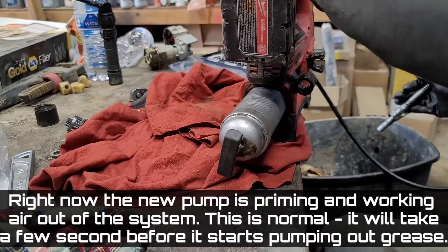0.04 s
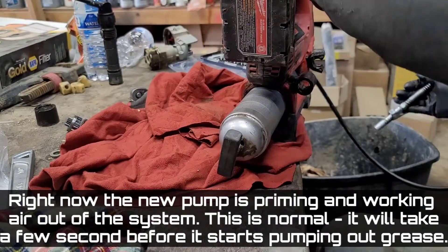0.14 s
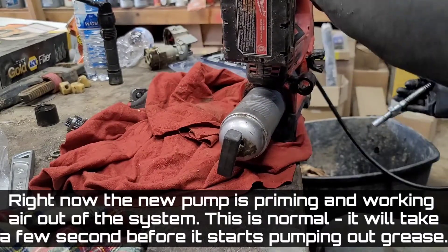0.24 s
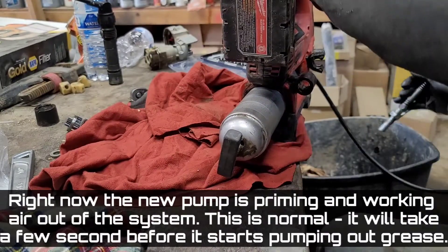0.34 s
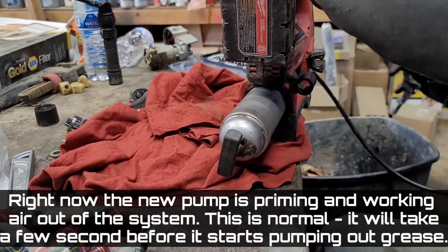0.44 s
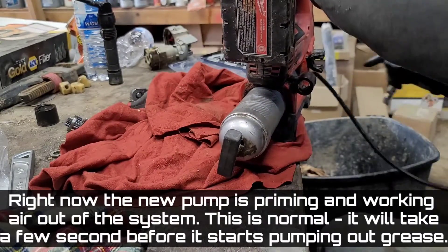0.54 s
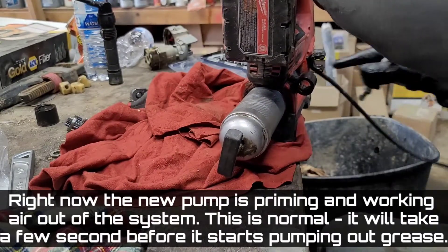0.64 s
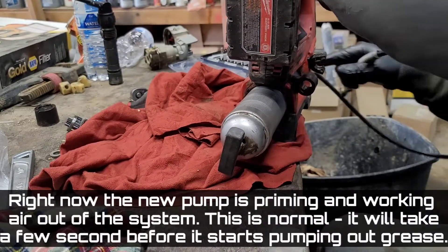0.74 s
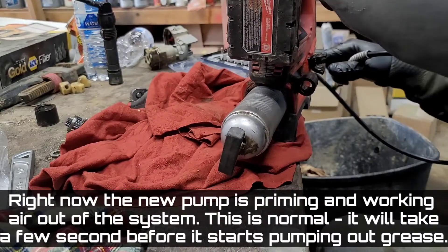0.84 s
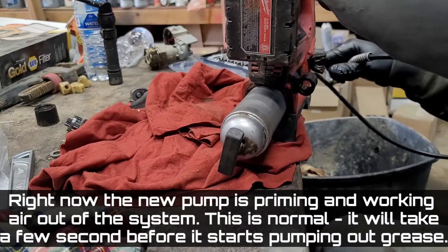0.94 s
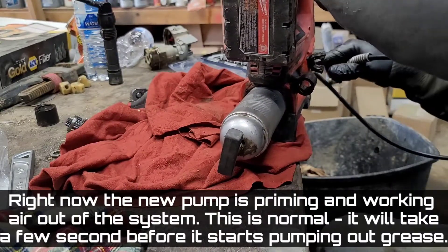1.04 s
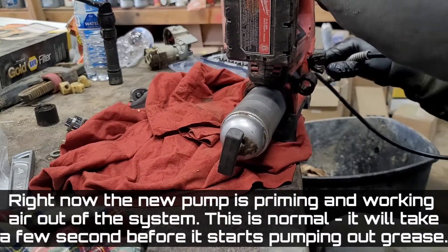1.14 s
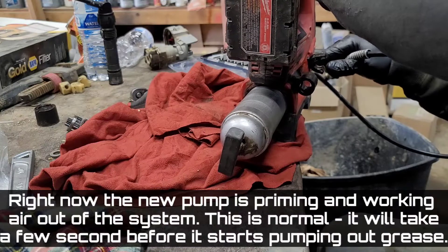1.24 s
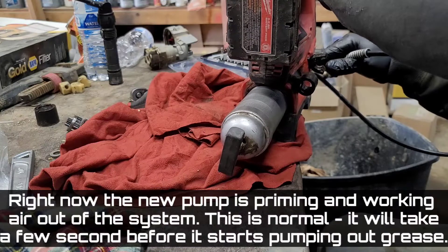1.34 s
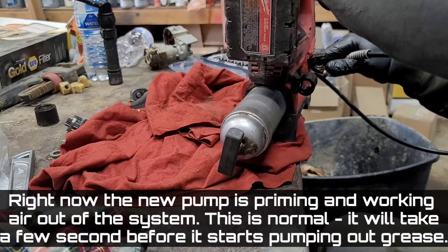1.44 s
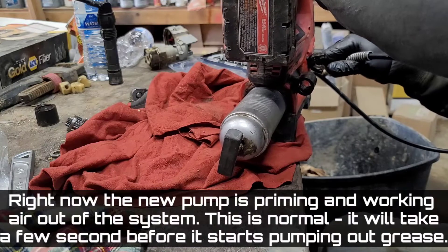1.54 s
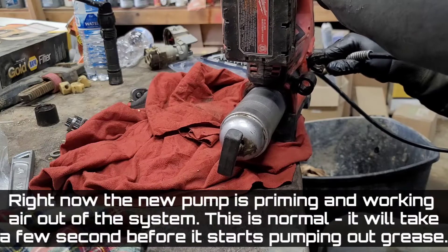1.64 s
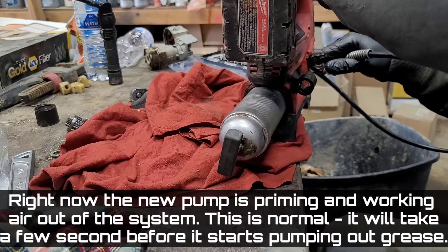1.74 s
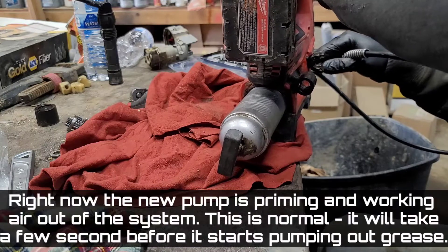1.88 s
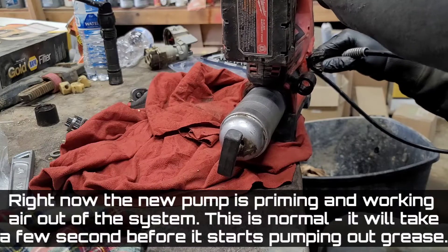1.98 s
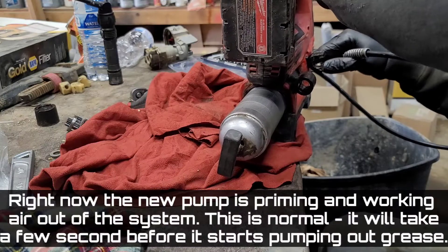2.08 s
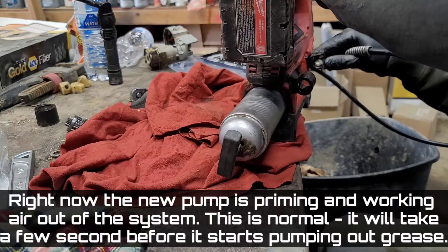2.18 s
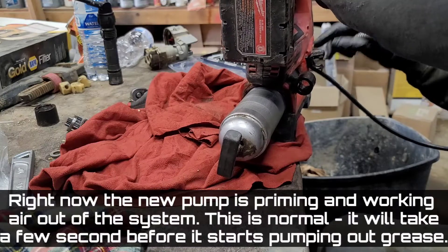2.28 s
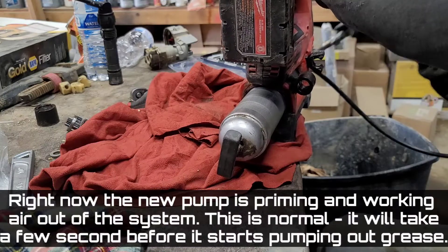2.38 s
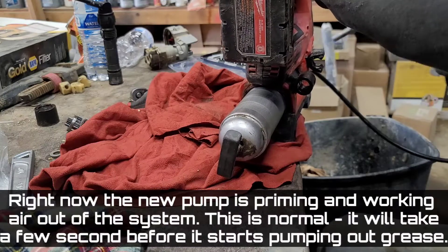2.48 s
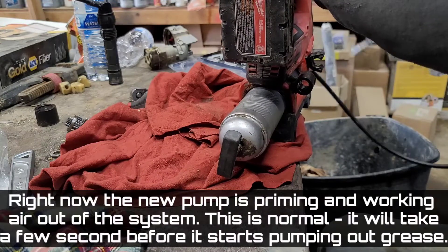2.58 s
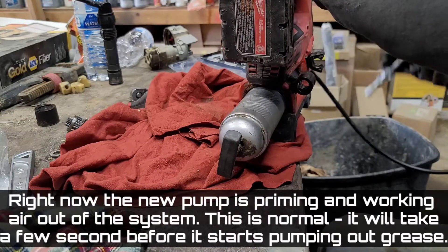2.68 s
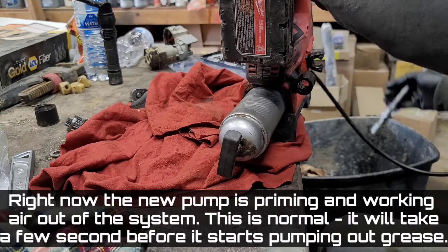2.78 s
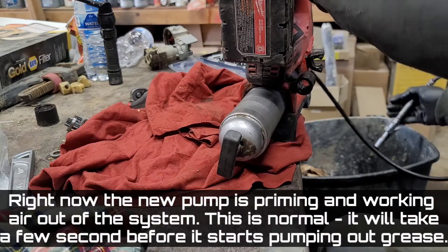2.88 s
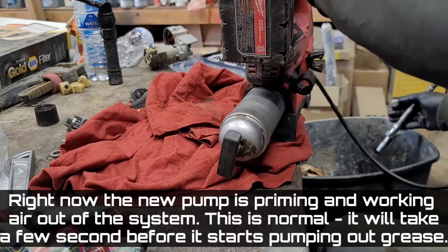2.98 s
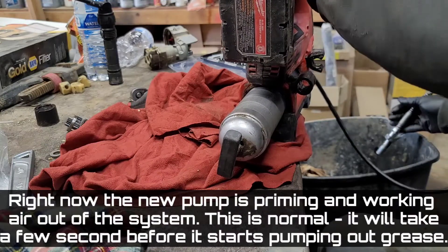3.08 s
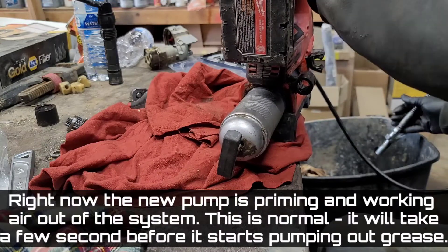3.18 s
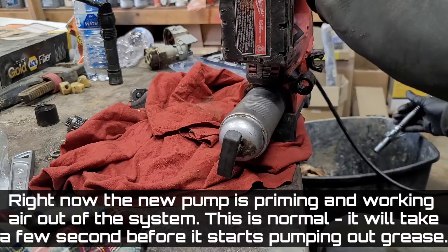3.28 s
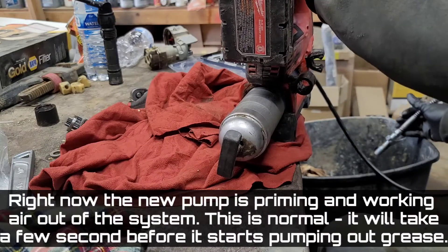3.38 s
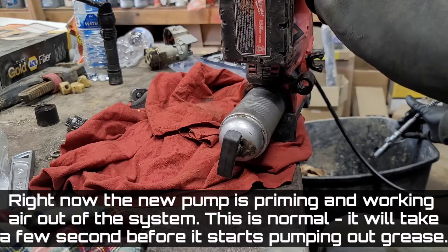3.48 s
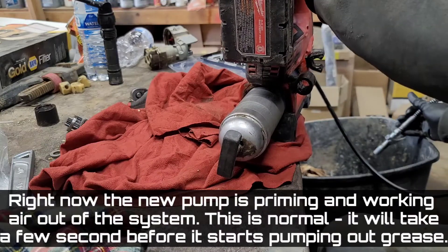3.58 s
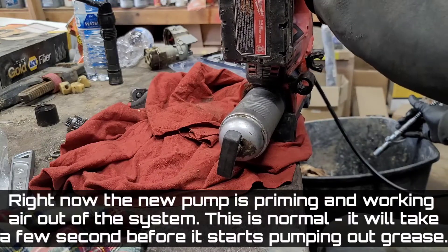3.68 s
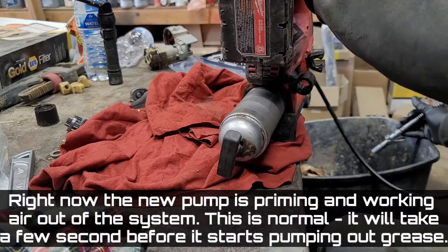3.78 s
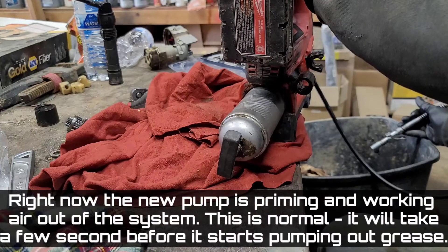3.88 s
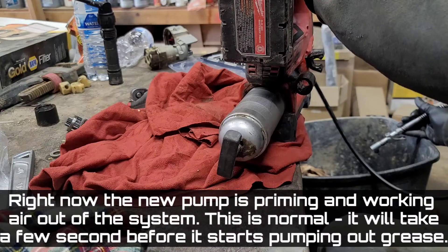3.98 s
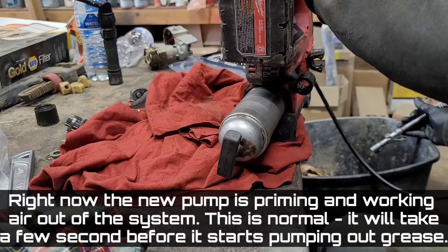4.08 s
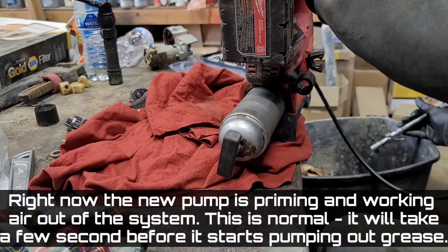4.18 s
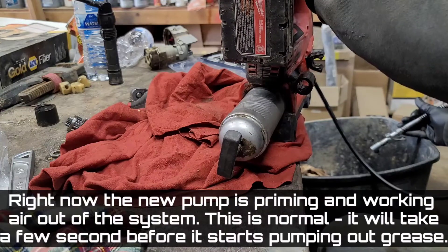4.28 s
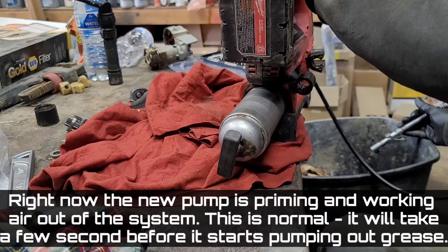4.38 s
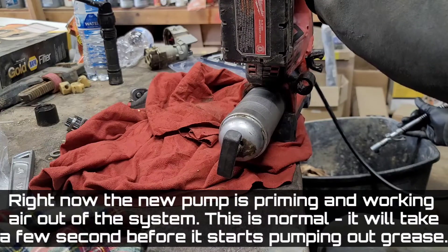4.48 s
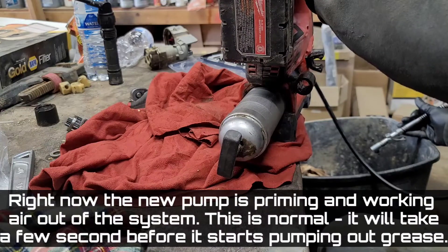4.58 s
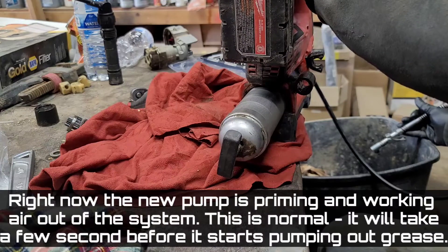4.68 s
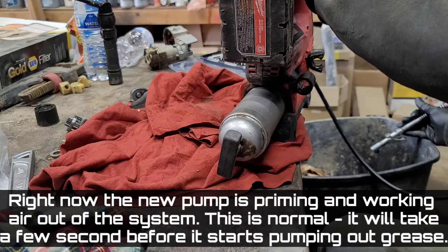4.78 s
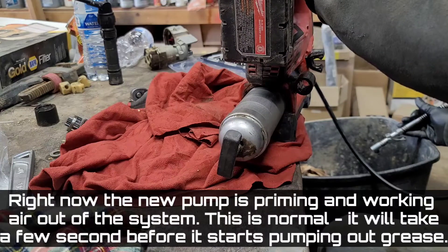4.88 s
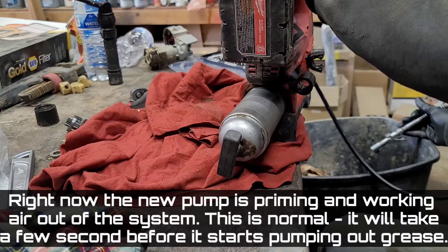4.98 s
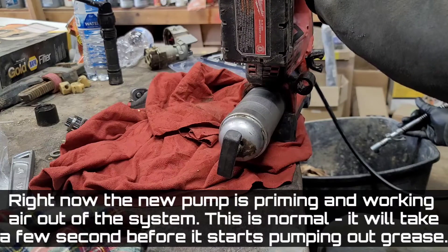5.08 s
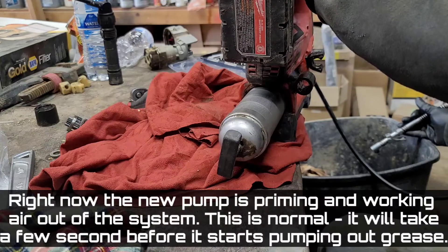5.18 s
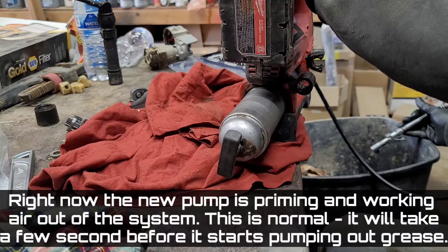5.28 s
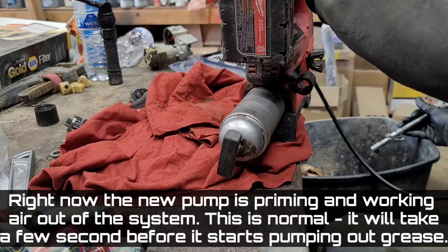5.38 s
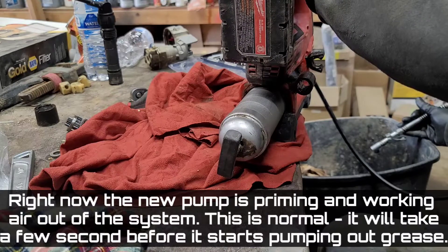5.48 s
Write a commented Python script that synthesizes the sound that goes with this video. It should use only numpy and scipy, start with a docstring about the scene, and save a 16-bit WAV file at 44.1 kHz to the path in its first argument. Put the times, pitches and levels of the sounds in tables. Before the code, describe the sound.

A battery grease gun whines at full speed, cuts out abruptly, leaves quiet workshop hum, then clicks and whirs back up to run on.

```python
"""Close on a workbench, a battery grease gun runs at full speed: shaft tones over gear and air noise.
At 0.63 s the trigger is let go; the motor slows, the gears jolt to a halt and small metal ticks follow.
Near 1.9 s a faint peep sounds far off; then switch clicks, and at 2.73 s the motor spins up again under a
fixed chopping tone, with one more jolt as the gears take up the load, and runs on to the end.
Throughout, a workshop hums, hisses and echoes around a stereo camera microphone."""
import sys
import numpy as np
from scipy import signal
from scipy.fft import rfft, irfft, next_fast_len
from scipy.io import wavfile
from scipy.ndimage import uniform_filter1d, map_coordinates

SR = 44100
rng = np.random.default_rng(int(sys.argv[2]) if len(sys.argv) > 2 else 0)


def digitize_waveform(pressure):
    """Quantize a signal to 16-bit integers and store it at the path in sys.argv[1].

    Rows of a 2-D input are taken as channels; values are limited to [-1, 1].
    """
    field = np.atleast_2d(pressure).T
    bounded = np.clip(field, -1, 1)
    quanta = np.round(bounded * 32767).astype(np.int16)
    wavfile.write(sys.argv[1], SR, quanta)


N = 243828
TIME = np.arange(N) / SR  # s

# All levels are relative settings, before the trims in the functions.
# Shaft speed at full power, as the load of the pump lets it run: [t/s, f/Hz]
FULL_SPEED = [(0, 309), (.1, 309.6), (.4, 306.9), (.52, 309.2), (2.92, 306), (3.1, 309), (3.28, 307.4),
              (3.4, 309.3), (3.47, 307.8), (3.62, 310.9), (3.95, 310.1), (4.06, 312.3), (4.38, 309.9),
              (4.55, 311.7), (4.9, 311), (5.02, 312.8), (5.2, 310.7), (5.53, 312)]
# The main whine: [shaft order, left over right/dB, right lead/rad]
MAIN_WHINE = (12, 2, .4)
# Other tones tied to the shaft: [shaft order, left level/dB, right level/dB, right lead/rad, blur/Hz,
# steady share of power 0-1]
SHAFT_TONES = [(1, -43.5, -52.5, 2.2, 7, .93), (2, -58, -54, -2.2, 8, .6), (3, -59, -52, 2.4, 8, .6),
               (4, -60, -55, 2.0, 10, .5), (5, -41, -42, -2.2, 9, .7), (6, -48, -53, .2, 14, .5),
               (10.22, -47, -41, -.4, 12, .65), (11, -51, -49, 0, 18, .4), (13, -55, -55, 0, 25, .4),
               (20, -45, -54, 1.0, 20, .75), (25, -57, -64, .9, 30, .4), (30, -50, -41.5, 2.4, 20, .7),
               (35, -51, -43.5, -1.6, 20, .75)]
# Resonances that the whine crosses as the speed changes: [f/Hz, width/Hz, gain/dB]
WHINE_RESONANCES = [(2330, 220, 6), (3470, 260, 6.5)]
# Spectrum of the gear whirr at the left port: [f/Hz, level/dB per Hz]
GEAR_SPECTRUM = [(88, -55), (150, -27.5), (254, -25), (305, -9.5), (403, -18), (621, -6), (986, -13),
                 (1520, -4.5), (2070, -9.5), (2730, -6), (3610, -2), (4340, -10.5), (6000, -14),
                 (7800, -24.5), (13200, -120)]
# Spectrum of cooling air and brushes at the left port: [f/Hz, level/dB per Hz]
AIR_SPECTRUM = [(3000, -33.5), (4500, -6.5), (5500, -11), (6800, 4), (7600, -3.5), (8600, -2), (9600, -3),
                (10500, 2.5), (11200, -3), (11900, -6), (13000, -4.5), (13800, 0), (14400, -6.5),
                (15200, 3)]
# Peaks and dips of the housing: [f/Hz, width/Hz, gain/dB]
HOUSING_RESONANCES = [(776, 36, 1), (1843, 64, 4), (2300, 132.2, 7), (3450, 158.6, 0), (4580, 110, 2.5),
                      (6825, 120, -2.5), (8400, 120, 3), (8760, 100, 2.5), (10510, 460, -11.5),
                      (14200, 390, -6.5), (15360, 300, 4.5)]
# How the two microphone ports hear the gun, the right one shadowed in two bands: [f/Hz, left over right/dB]
PORT_BALANCE = [(200, -1), (330, 6), (600, 4), (900, -1), (2000, .5), (5800, 0), (6900, 5), (7600, 13),
                (8300, 11), (9000, 0), (10600, -7), (11600, 2), (12900, 10), (14000, 4)]
# How alike the gun's noise is at the two ports: [f/Hz, likeness -1 to 1]
GUN_LIKENESS = [(150, 0.75), (330, 0.79), (700, 0.29), (1300, 0.28), (2000, 0.8), (2700, .1), (3700, 0.64),
                (4300, 0.24), (6500, 0.077), (8500, 0.025), (9300, -0.13), (10800, -0.69), (14000, 0.42),
                (15300, -0.2)]
# The chopping tone and its two overtones: [level/dB] each
CHOP_LEVELS = [-38, -33, -55]
# Jolts of the gear train, at the halt and on taking up the load: [t/s, level/dB, left over right/dB,
# dullness, brighter below 0]
GEAR_JOLTS = [(.672, -37.5, -5, 0), (.684, -30, 4, -0.034), (2.873, -29, 0, -0.48)]
# Ringing of the gun's case: [f/Hz, level/dB, t60/s]
CASE_MODES = [(797, 0, .08), (700, -4, .05), (1150, -6, .03), (1507, -5, .03), (1803, -6, .03),
              (300, -13, .22)]
# Clicks of trigger and switch: [t/s, level/dB, left over right/dB, dullness]
SWITCH_CLICKS = [(2.5, -61, 0, .3), (2.6615, -42, 2.5, .5), (2.7093, -24, 2.5, .2)]
# Ringing of the switch: [f/Hz, level/dB, t60/s]
SWITCH_MODES = [(900, -15, .015), (1480, -7, .035), (1900, -6, .014), (2358, 0, .012), (2972, -5, .014),
                (3510, -6, .015), (4900, -9, .01), (6400, -8, .012)]
# Small metal ticks after the stop, each with a bounce: [t/s, level/dB, left over right/dB]
METAL_TICKS = [(.9845, -62, -.5), (.999, -66, -.5), (1.0975, -64, 1), (1.113, -71, 1)]
# Ringing of the ticks: [f/Hz, level/dB, t60/s]
TICK_MODES = [(3400, -3, .05), (3520, 0, .04), (3650, -3, .02), (2650, -8, .02), (4700, -10, .02),
              (6800, -9, .015)]
# A faint far peep: [from t/s, to t/s, f/Hz, level/dB]
FAR_PEEP = (1.91, 2.03, 4470, -87)
# The workshop's answer: [f/Hz, t60/s, echo level/dB]
WALL_ECHO = [(300, 0.25, 1), (1480, 0.35, 5.5), (3507, 0.34, -2.5), (7250, 0.282, -7), (12890, 0.2, -6)]
# Workshop hum and hiss: [f/Hz, level/dB per Hz]
SHOP_SPECTRUM = [(12, -45.5), (20, -14), (74, -1), (108, -8), (180, -12.5), (217, -16), (300, -15),
                 (430, -17.5), (790, -22), (860, -27), (2160, -37), (4460, -46.5), (7000, -46),
                 (7600, -54.5), (15500, -67.5)]
# How alike the workshop is at the two ports: [f/Hz, likeness -1 to 1]
SHOP_LIKENESS = [(40, .92), (90, .9), (150, .8), (380, -.18), (950, -.5), (2380, -.2), (6000, 0)]

FULL_HZ = 311  # reference speed of the shaft in full run
# trigger let go (s), slowing under the brake (Hz per s), gears halt (s)
RELEASE_S, BRAKE_HZ_PER_S, HALT_S = .63, 700, .684
START_S, RAMP_S = 2.73, .083  # soft start: the drive's duty climbs to full
KICK_HZ, RAMP_HZ, CATCH_UP_S = 80, 197, .023  # speed as the ramp begins and ends, time constant of the rest
# gear whirr: level, growth with speed on the restart, rise time, decay after the halt
WHIRR_DB, WHIRR_DB_PER_DECADE, WHIRR_ATTACK_S, WHIRR_DIES_DB_PER_S = -31, 24, 0.011, 600.5
# main whine: unloaded, growth with speed, dB per Hz of lost speed
WHINE_DB, WHINE_DB_PER_DECADE, WHINE_LOAD_DB = -32.8, 40, -.6
THIN_DB, THIN_LOAD_DB = 1.5, 0.65  # thin tones: gain unloaded, dB per Hz of lost speed
CHOP_HZ = 1988
CHOP_DULLS_DB, DUTY_FROM = -5, .06  # overtone change per unit of duty; duty at which the ramp begins
SHOP_DB = -56
TOP_HZ = 15510  # middle of the microphone's upper cut-off


def motor():
    """Shaft tones, gear whirr and air all follow the shaft speed: toward the ports, and toward the walls."""
    speed, load = shaft()
    turns = np.cumsum(speed + .55 * wobble(14)) / SR
    pace = speed / FULL_HZ
    running = gate(0, HALT_S - .012, fade=.012) + gate(START_S, N / SR, fade=.012)
    tones = main_whine(speed, load, turns, running) + shaft_tones(pace, load, turns, running)
    noise, noise_away = whirr_and_air(pace, turns)
    return noise + tones, noise_away + amp(-6) * tones


def shaft():
    """Shaft speed, and speed lost to the load: braked on release; ramped, then catching up, at the start."""
    full = np.interp(TIME, *np.transpose(FULL_SPEED))
    braked = full - BRAKE_HZ_PER_S * np.clip(TIME - RELEASE_S, 0, .3)
    ramp = np.interp(TIME, [START_S, START_S + RAMP_S], [KICK_HZ, RAMP_HZ])
    behind = np.exp(-np.maximum(TIME - START_S - RAMP_S, 0) / CATCH_UP_S)
    starting = full - (full - ramp) * behind
    speed = np.where(TIME < (HALT_S + START_S) / 2, braked, starting)
    return speed, FULL_HZ - full


def main_whine(speed, load, turns, running):
    """The strongest shaft tone, swelling with speed and as its pitch crosses resonances."""
    order, pan_db, lead = MAIN_WHINE
    hz = order * speed
    level_db = WHINE_DB + WHINE_LOAD_DB * load + WHINE_DB_PER_DECADE * np.log10(speed / FULL_HZ)
    level_db = level_db + peaks(HOUSING_RESONANCES, hz) + peaks(WHINE_RESONANCES, hz)
    tone = running * amp(level_db) * blurred(turns, order, blur_hz=20, steady=.84)
    return at_ports(tone, pan_db / 2, -pan_db / 2, lead)


def shaft_tones(pace, load, turns, running):
    """Tones at multiples of the shaft speed; the higher the order, the faster it grows with speed."""
    # with the load, the thin tones at 20 and 35 times the shaft speed grow and the lowest tone shrinks
    thin = amp(THIN_DB + THIN_LOAD_DB * load)
    load_gain = {1: amp(WHINE_LOAD_DB * load), 20: thin, 35: thin}
    total = np.zeros((2, N))
    for order, left_db, right_db, lead, blur_hz, steady in SHAFT_TONES:
        level = running * pace ** (3 + order / 4) * load_gain.get(order, 1)
        total += at_ports(level * blurred(turns, order, blur_hz, steady), left_db, right_db, lead)
    return total


def whirr_and_air(pace, turns):
    """Gear noise, and air and brush hiss pulsing once a turn, both coloured by the housing."""
    right_only = np.array([[0], [1]])
    ports = lambda hz: peaks(HOUSING_RESONANCES, hz) - along(PORT_BALANCE, hz) * right_only
    gears = rush(lambda hz: along(GEAR_SPECTRUM, hz) + ports(hz), GUN_LIKENESS, patchy_db=1.5)
    air = rush(lambda hz: along(AIR_SPECTRUM, hz) + ports(hz), GUN_LIKENESS, patchy_db=1.2)
    dying = amp(WHIRR_DB - WHIRR_DIES_DB_PER_S * np.maximum(TIME - HALT_S, 0))
    rising = amp(WHIRR_DB + WHIRR_DB_PER_DECADE * np.log10(pace))
    whirr = dying + gate(START_S, N / SR, WHIRR_ATTACK_S) * rising
    # on the restart the hiss comes up with the drive's duty
    duty = np.where(TIME > 1, drive_duty(), 1)
    grind = whirr * amp(1.0 + 0.17 * wobble(11))
    pulse = 1 + .1 * np.sin(2 * np.pi * turns)
    blow = whirr * duty ** 1.6 * amp(3 + 0.45 * wobble(21)) * pulse
    # toward the walls each side of the noise is played backwards in time, so the walls hear a different stretch
    # of it
    return grind * gears + blow * air, grind * gears[:, ::-1] + blow * air[:, ::-1]


def drive_duty():
    """Share of each chop that the supply is on, rising linearly over the soft start."""
    return np.interp(TIME, [START_S, START_S + RAMP_S], [DUTY_FROM, 1])


def drive():
    """The chopped supply makes the windings sing; as in a pulse wave, partial k follows sin(k pi duty)."""
    duty = drive_duty()
    low, high, top = [amp(db) * np.sin(np.pi * k * duty) * np.sin(2 * np.pi * k * CHOP_HZ * TIME)
                      for k, db in enumerate(CHOP_LEVELS, 1)]
    overtones = amp(CHOP_DULLS_DB * duty) * (high * np.array([[.8], [1.2]]) + top)
    flutter = amp(1.5 * wobble(120))
    return gate(START_S, N / SR, fade=.005) * np.sqrt(2) * flutter * (low + overtones)


def gear_jolts():
    """The gear train jolts as it halts and as it takes up the load, ringing the case."""
    return struck(GEAR_JOLTS, CASE_MODES, crack=.4)


def switch_clicks():
    """Trigger and switch parts snap together and ring briefly."""
    return struck(SWITCH_CLICKS, SWITCH_MODES, crack=2.4)


def metal_ticks():
    """Small metal parts tick and bounce, with a high short ring."""
    return struck(METAL_TICKS, TICK_MODES, crack=1.4)


def peep():
    """A thin tone far off, breathy because its size and phase wander quickly."""
    start, end, hz, db = FAR_PEEP
    return amp(db) * gate(start, end, fade=.015) * np.real(blurred(TIME, hz, 300, .1))


def walls(x):
    """Each frequency of the workshop's answer has its own strength and dies at its own speed."""
    hz, t, z = signal.stft(rng.standard_normal((2, SR // 2)), SR, nperseg=256)
    t60 = along([row[:2] for row in WALL_ECHO], hz)[:, None]
    echo_db = along([row[::2] for row in WALL_ECHO], hz)[:, None]
    # a longer tail is not a louder one: its energy is evened out
    decay = amp(echo_db - 60 * t / t60) / np.sqrt(t60 * SR / (2 * np.log(1000)))
    tail = signal.istft(z * decay, SR, nperseg=256)[1]
    late = np.pad(x, ((0, 0), (300, 0)))  # 300 samples of extra path
    return signal.fftconvolve(late, tail, axes=1)[:, :N]


def shop():
    """Hum and hiss of the workshop: shaped noise whose level drifts a little."""
    noise = rush(lambda hz: along(SHOP_SPECTRUM, hz), SHOP_LIKENESS, patchy_db=-0.7)
    return amp(SHOP_DB + 0.26 * wobble(9.2)) * noise


def struck(events, modes, crack):
    """Every blow rings the modes at new strengths, with a burst of noise; dull blows lose their treble."""
    out, t = np.zeros((2, N + SR)), np.arange(SR // 3) / SR
    hz = np.fft.rfftfreq(len(t), 1 / SR)
    contact = 1 - np.exp(-t / .0007)  # the blow takes a moment to build
    for s, db, pan_db, *dull in events:
        tilt = lambda f: -12 * sum(dull) * np.log2(f / 1500 + .1)
        ring = sum(amp(level + tilt(f) + rng.normal(0, 2) - 60 * t / t60)
                   * np.sin(2 * np.pi * (f * t + rng.random())) for f, level, t60 in modes)
        colour = amp(tilt(hz)) / (1 + (1100 / (hz + 1)) ** 4) / (1 + (hz / 6500) ** 2)
        burst = irfft(rfft(rng.standard_normal((2, len(t)))) * colour, len(t))
        snap = crack * (amp(-60 * t / 0.016) + 0.22 * amp(-60 * t / .09)) * burst
        sides = amp(db - 1.5 + np.array([[pan_db], [-pan_db]]) / 2)
        first = round(s * SR)
        out[:, first:first + len(t)] += sides * contact * (ring + snap)
    return out[:, :N]


def rush(level_db, alike, patchy_db):
    """Stereo noise of rms 1 with patches of random gain; level_db(hz) may differ left and right."""
    z = signal.stft(rng.standard_normal((2, N)), nperseg=512)[2]
    field = uniform_filter1d(rng.standard_normal(z.shape[1:]), size=5, axis=0)
    field = uniform_filter1d(field, size=8, axis=1)
    pair = signal.istft(z * amp(patchy_db * unit(field)), nperseg=512)[1][:, :N]
    # sharing mid and side by this angle sets the likeness of left and right
    turn = lambda hz: np.arccos(np.clip(along(alike, hz), -1, 1)) / 2
    mid, side = filtered(pair, lambda hz: np.array([np.cos(turn(hz)), np.sin(turn(hz))]))
    return unit(filtered(np.array([mid + side, mid - side]), lambda hz: amp(level_db(hz))))


def blurred(turns, order, blur_hz, steady):
    """A complex tone: a steady part plus a part whose size and phase wander."""
    wander = unit(wobble(blur_hz) + 1j * wobble(blur_hz))
    steady = np.clip(steady, 0, 1)
    size = np.sqrt(steady) + np.sqrt(1 - steady) * wander
    return size * np.sqrt(2) * np.exp(2j * np.pi * order * turns)


def at_ports(tone, left_db, right_db, lead):
    """A complex tone as heard left and right, the right port ahead by lead radians."""
    return np.real(tone * amp([[left_db], [right_db]]) * np.exp(1j * np.array([[0], [lead]])))


def peaks(rows, hz):
    """Summed gain in dB of resonances given as (Hz, width Hz, dB)."""
    return sum(db / (1 + (2 * (hz - centre) / width) ** 2) for centre, width, db in rows)


def along(points, hz):
    """(Hz, value) points read on a log frequency axis."""
    f, v = np.transpose(points)
    return np.interp(np.log(hz + 1), np.log(f + 1), v)


def filtered(x, response):
    """x times a response of frequency."""
    m = next_fast_len(N + SR // 2)
    return irfft(rfft(x, m) * response(np.fft.rfftfreq(m, 1 / SR)), m)[..., :N]


def wobble(rate):
    """A smooth random curve, rate knots a second."""
    return map_coordinates(rng.standard_normal(int(N * rate / SR) + 4), [TIME * rate])


def gate(start, end, fade):
    """1 between two moments, with ramps of fade seconds just outside them."""
    return np.clip(np.minimum(TIME - start, end - TIME) / fade + 1, 0, 1)


def amp(db):
    """Gain of a level in dB."""
    return 10 ** (np.asarray(db) / 20)


def unit(x):
    """x at rms 1."""
    return x / np.sqrt(np.mean(np.abs(x) ** 2) + 1e-20)


def scene():
    """The gun close to the microphone, its echo off the walls, the workshop and the far peep."""
    near, away = motor()
    song = drive()
    jolts = gear_jolts()
    clicks = switch_clicks() + metal_ticks()
    # the low jolts and the chopping tone reach the walls more weakly than the clicks
    sent = away + clicks + amp(-7) * (jolts + song)
    return near + song + jolts + clicks + amp(-5) * walls(sent) + shop() + peep()


def record(dry):
    """The camera microphone keeps nothing above its band limit, a smooth cut 90 Hz wide."""
    return filtered(dry, lambda hz: np.cos(np.pi / 2 * np.clip((hz - TOP_HZ) / 90 + .5, 0, 1)) ** 2)


dry = scene()
out = record(dry)
digitize_waveform(out)
```